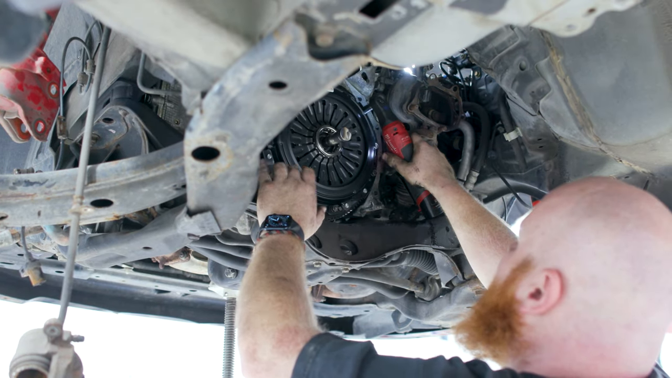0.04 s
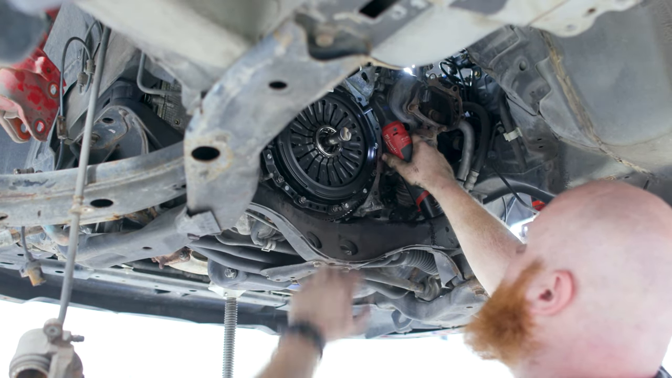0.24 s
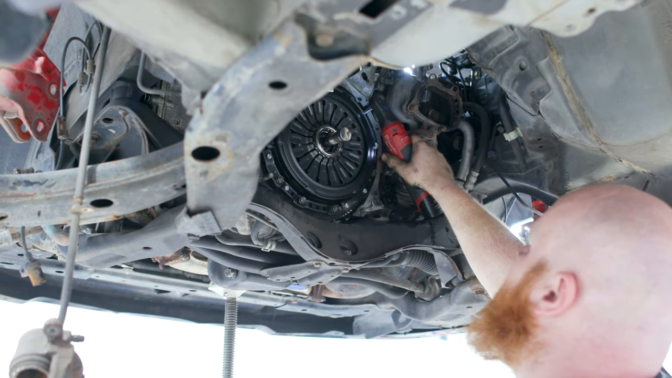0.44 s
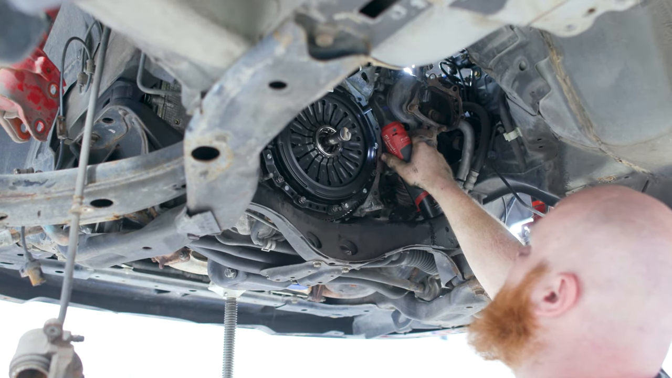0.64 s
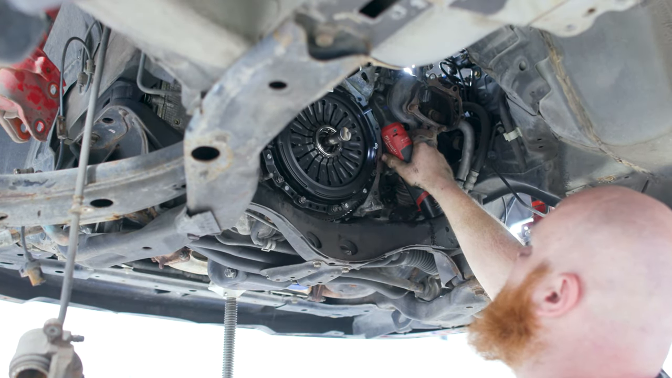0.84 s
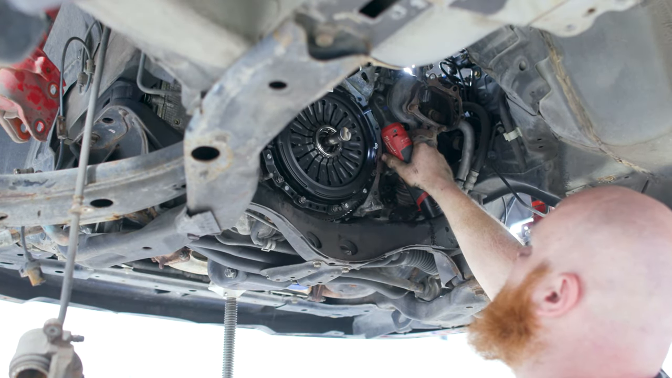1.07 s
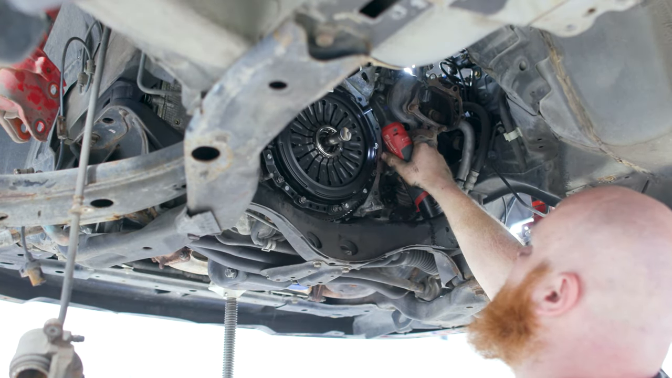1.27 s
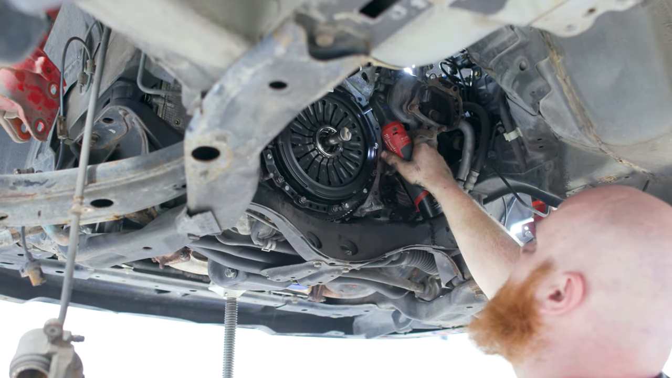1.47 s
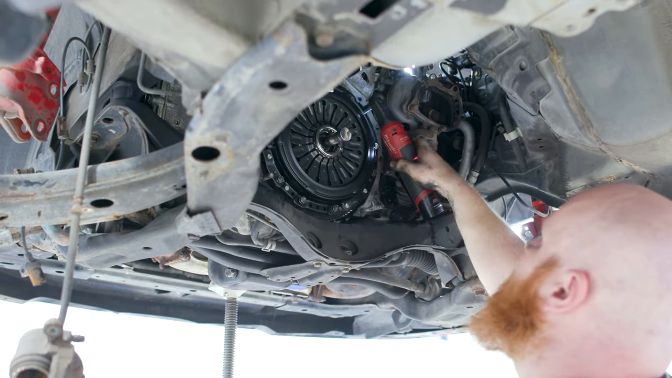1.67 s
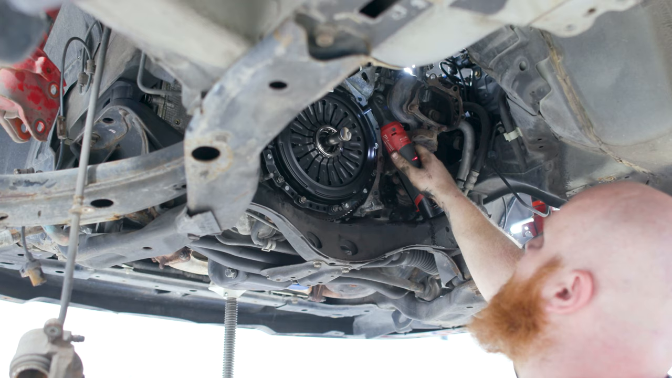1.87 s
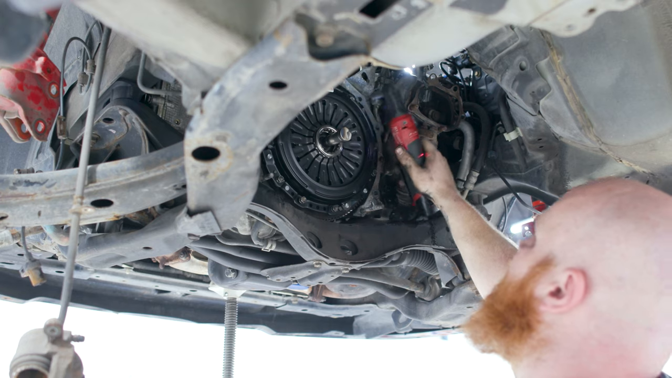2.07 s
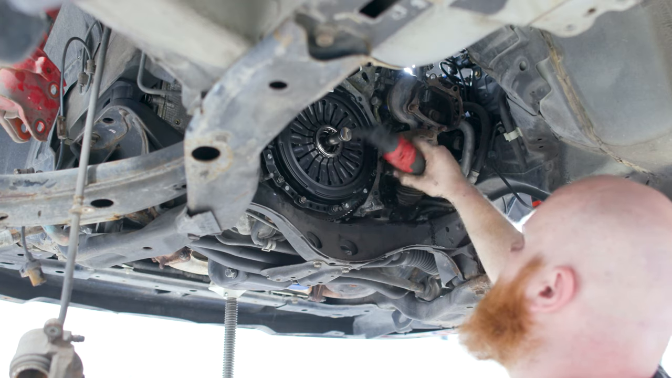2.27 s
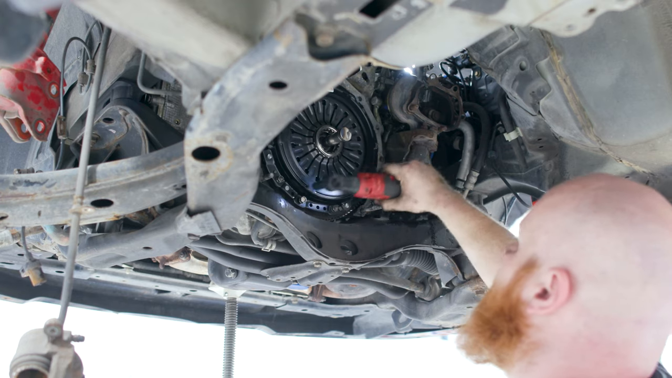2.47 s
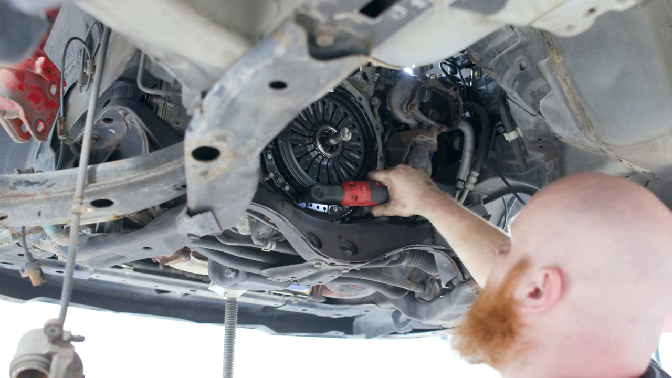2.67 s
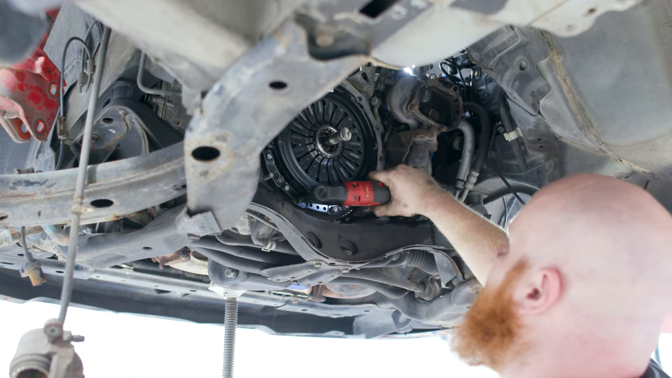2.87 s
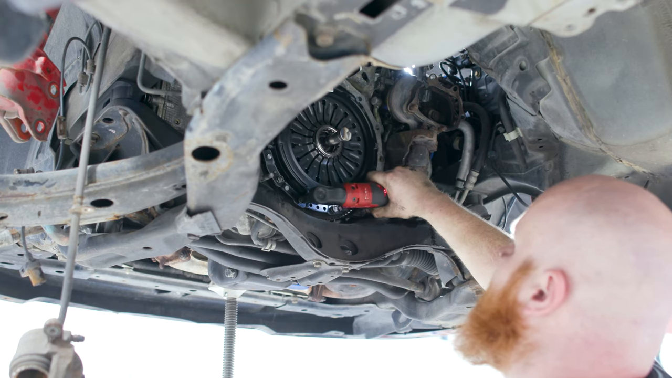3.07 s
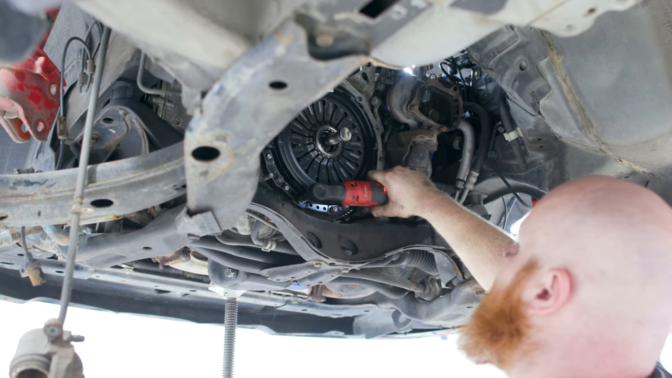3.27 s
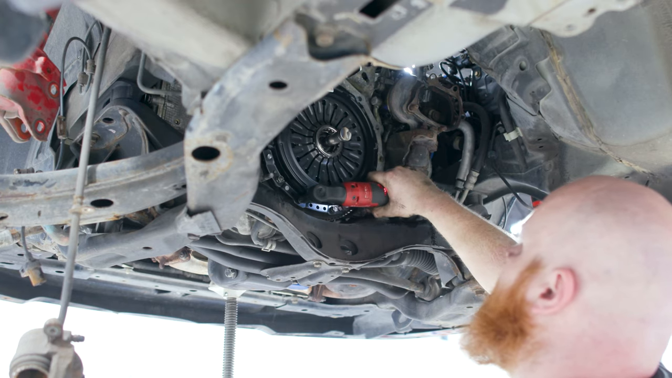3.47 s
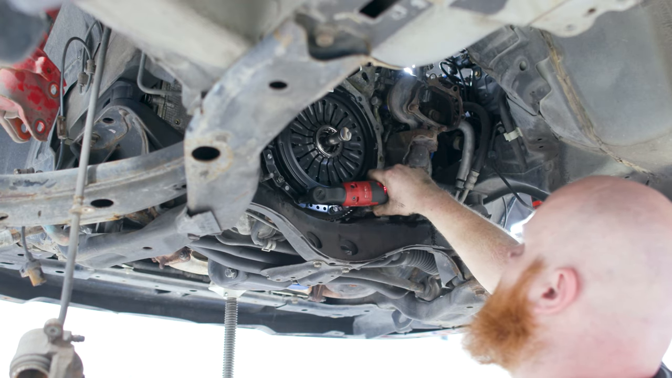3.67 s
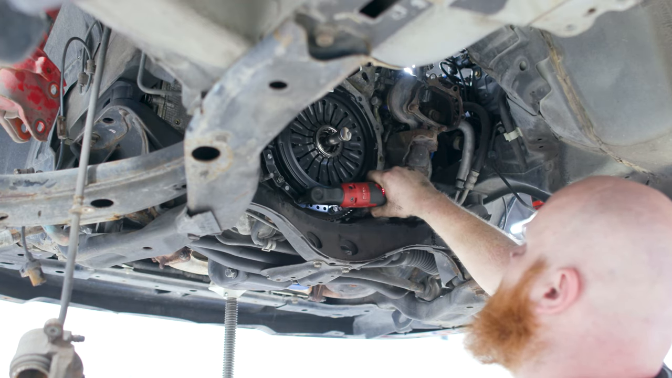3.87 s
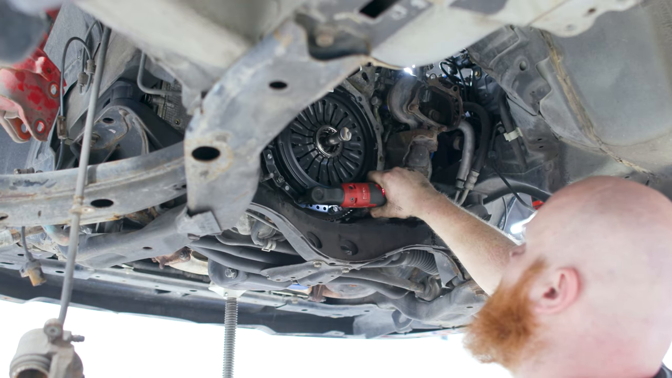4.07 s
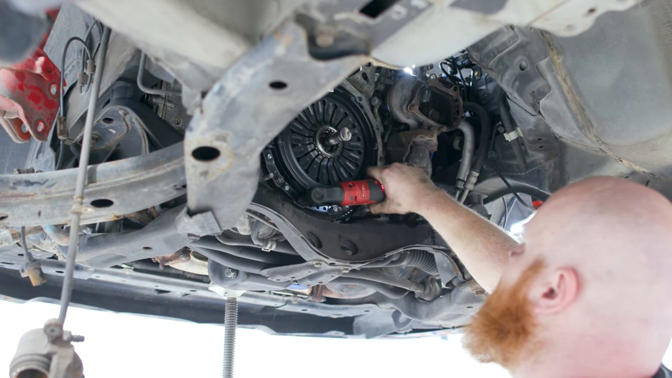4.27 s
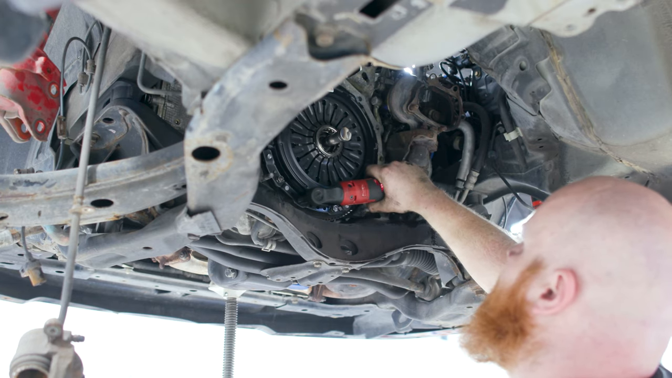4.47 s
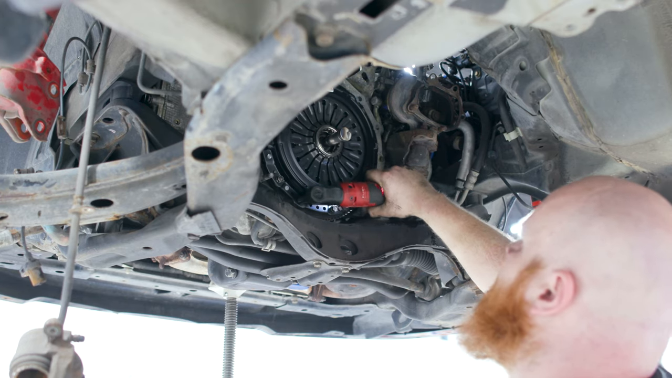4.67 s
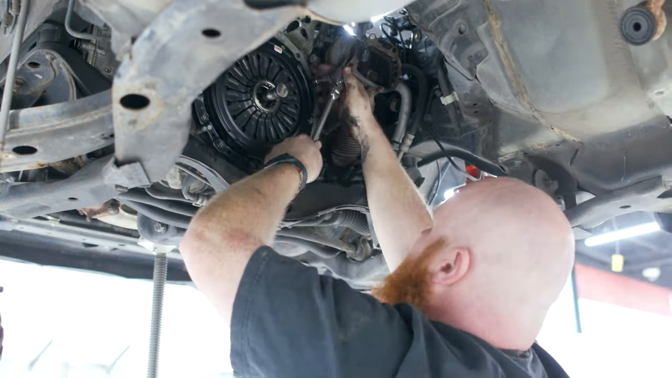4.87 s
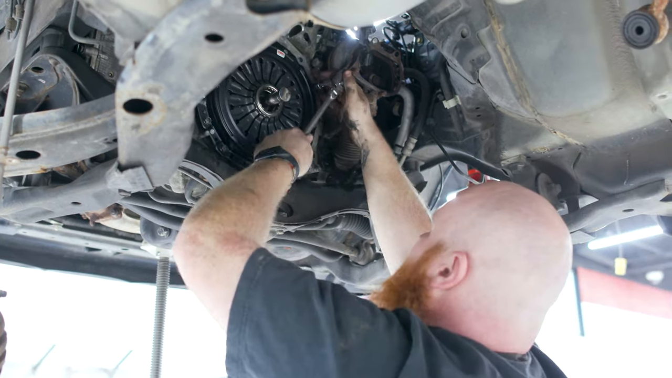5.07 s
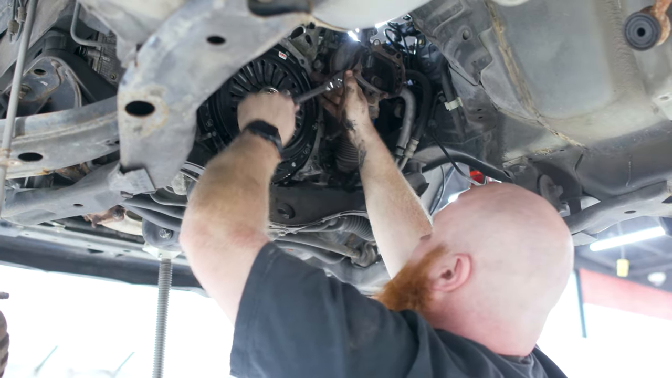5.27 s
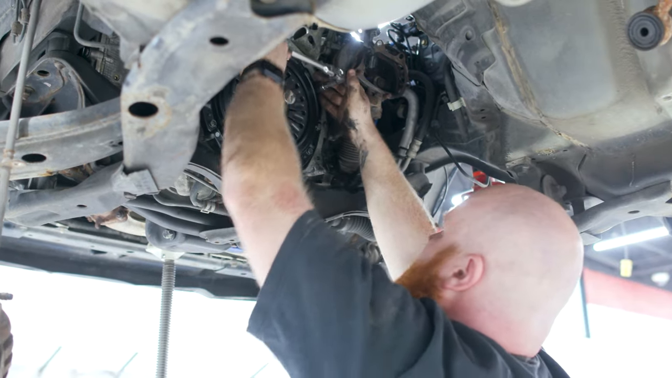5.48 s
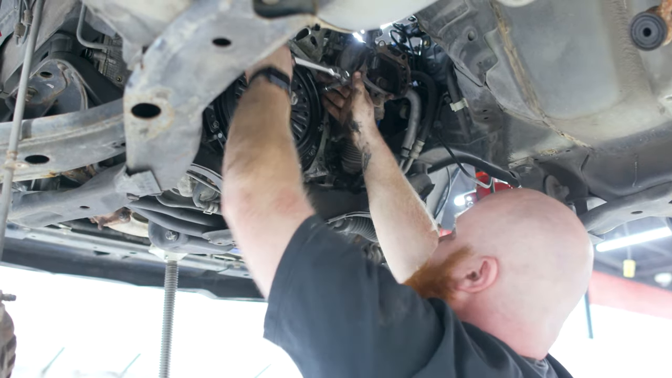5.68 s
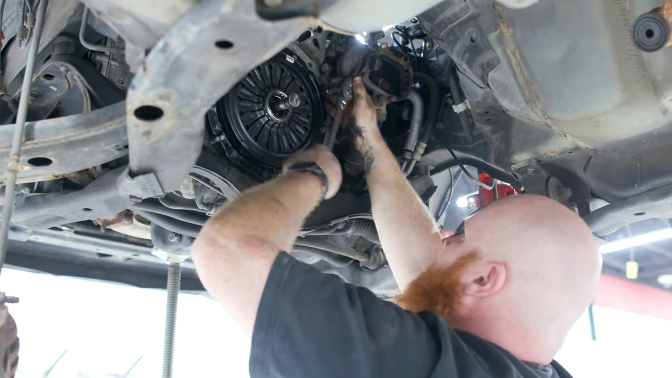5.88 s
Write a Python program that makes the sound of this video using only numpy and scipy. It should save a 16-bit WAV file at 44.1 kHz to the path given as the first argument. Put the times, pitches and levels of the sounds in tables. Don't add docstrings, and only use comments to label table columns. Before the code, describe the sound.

Close to the microphone, a cordless ratchet starts with a brief whistle and rasps for about a second, slowing into separate knocks as the bolt tightens. Quiet handling and metal ticks follow, then a hard clank on steel. A very short burst and another stalling burst come next, then near quiet with workshop hum and a faint hand-ratchet clicking at the end.

```python
import sys
import numpy as np
from scipy import signal
from scipy.fft import rfft, irfft, next_fast_len
from scipy.io import wavfile
from scipy.ndimage import uniform_filter1d

SR = 44100
rng = np.random.default_rng(int(sys.argv[2]) if len(sys.argv) > 2 else 0)


def ratio_of_db(decibels):
    return 10 ** (np.asarray(decibels, float) / 20)


def bounce(signal):
    frames = np.transpose(np.atleast_2d(signal))
    limited = np.clip(frames, -1, 1)
    pcm = np.round(limited * 32767).astype(np.int16)
    wavfile.write(sys.argv[1], SR, pcm)


N = 261072


def unit(x):
    return x / np.sqrt(np.mean(x ** 2) + 1e-20)


def drift(n, size, passes=1):
    x = rng.standard_normal(n)
    for _ in range(passes):
        x = uniform_filter1d(x, size=size)
    return unit(x)


def along(points, hz):
    f, v = np.transpose(points)
    return np.interp(np.log(hz + 1), np.log(f + 1), v)


def span(rows):
    s, *cols = np.transpose(rows)
    start = round(s[0] * SR)
    t = np.arange(start, min(round(s[-1] * SR), N)) / SR
    return start, [np.interp(t, s, c) for c in cols]


def add(out, start, x):
    out[start:start + len(x)] += x[:len(out) - start]


def hump(middle_s, width_s):
    return np.exp(-.5 * ((np.arange(N) / SR - middle_s) / width_s) ** 2)


def filtered(x, response):
    m = next_fast_len(len(x) + 8192)
    return irfft(rfft(x, m) * response(np.fft.rfftfreq(m, 1 / SR)), m)[:len(x)]


def modes(peaks):
    def response(f):
        total = 0
        for k, (c, w, db) in enumerate(peaks):
            total = total + (-1) ** k * ratio_of_db(db) * 1j * f * w / (c * c - f * f + 1j * f * w)
        return total
    return response


def noise(n, peaks):
    return unit(filtered(rng.standard_normal(n), modes(peaks)))


def ratchet():
    # t/s, speed/(turns/s)
    cranks = [
        [(.24, 10), (.33, 95), (.5, 120), (.63, 105), (.755, 111), (.805, 76), (.91, 72), (1.145, 52.5),
         (1.274, 34)],
        [(3.08, 10), (3.16, 95), (3.2, 107), (3.28, 105.5), (3.345, 121), (3.4, 121), (3.49, 90)],
        [(3.83, 10), (3.91, 102), (4.03, 122), (4.16, 124), (4.27, 104), (4.35, 70), (4.414, 49), (4.52, 33.8),
         (4.607, 14)],
    ]
    # t/s, level/dB
    efforts = [
        [(.254, -42), (.3, -31), (.355, -16), (.605, -13.5), (.681, -16.5), (.74, -15), (.807, -18),
         (1.03, -21), (1.277, -22)],
        [(3.09, -47.5), (3.13, -30.5), (3.184, -17.5), (3.318, -15.5), (3.414, -15), (3.478, -18)],
        [(3.848, -39), (3.89, -23), (3.962, -15), (4.266, -13), (4.51, -23.5), (4.562, -22), (4.58, -35),
         (4.598, -24), (4.614, -25)],
    ]
    # f/Hz, density/(dB per Hz)
    colours = [
        [(1350, -24), (2300, -5), (2970, -2), (4880, -1), (6660, -4.5), (7700, -3.5), (10000, -8.5),
         (15600, -18.5)],
        [(1350, -28), (2300, -7), (3630, -2), (4100, -6), (5820, -2), (9250, -8), (11800, -9), (15600, -22.5)],
        [(1350, -28.5), (2300, -5.5), (3090, -2.5), (3900, -4), (5820, 1.5), (6300, -3.5), (11000, -7.5),
         (15600, -22)],
    ]
    # f/Hz, width/Hz, level/dB
    heads = [
        [(3810, 110, -5.5), (4398, 70, 3.5), (4905, 93, -4), (5720, 89, -2.5), (5940, 71, -3.5), (7450, 42, -2),
         (7650, 40, -7.5), (7860, 58, -8), (10400, 52, -7)],
        [(3940, 180, -7), (4730, 48, 3.5), (5710, 91, -9.5), (7090, 72, -1.5), (7400, 54, -8.5),
         (8970, 43, -1.5), (10300, 69, -9.5)],
        [(3790, 350, -6.5), (4950, 190, 0), (5100, 67, -1.5), (5740, 63, -0.5), (7000, 95, -8.5),
         (8530, 80, -4.5), (10400, 30, -7.5), (10900, 40, -7.5)],
    ]
    # f/Hz, width/Hz, level/dB
    housings = [
        [(1574, 260, -9), (2019, 53, 7.5), (2256, 470, -5), (2230, 130, -11.5)],
        [(1620, 600, 8.5), (2000, 67, 0), (2540, 480, -11)],
        [(1766, 140, 6.5), (2040, 110, 8), (2460, 750, -1)],
    ]
    # f/Hz, width/Hz, level/dB
    parts = [
        [(218, 180, -5), (590, 23, -22.5), (669, 85, 8.5), (910, 110, 2.5), (1218, 150, 6)],
        [(341.8, 61, -21), (495, 32, -8.5), (926, 74, -5), (957, 67, -7), (1210, 70, -1.5), (1410, 78, -11)],
        [(343, 44, -12.5), (482, 33, -4), (780, 230, -4.5), (1045, 80, -2), (1191, 60, 5), (1535, 440, -6.5)],
    ]
    # housing free/dB, housing biting/dB, part free/dB, part biting/dB, rebound re blow
    grips = [
        (-6, -13, -14, -2, 0.46),
        (-10.5, -14, -11, -9, .6),
        (-10, -8, -13, 1, 0.43),
    ]
    sags = [
        0,
        0,
        0.1,
    ]
    # t/s, width/s, first order/dB, second order/dB
    shakes = [
        (0.521, 0.026, -26.5, -26.5),
        (.75, 0.028, -23, -28.5),
        (1.0, .04, -58, -28.5),
        (1.15, 0.036, -62, -33.5),
    ]
    out = whine()
    for settings in zip(efforts, grips, cranks, housings, parts, sags, colours, heads):
        add(out, *burst(*settings))
    angle_rad = 2 * np.pi * turns(cranks[0], 0, N)
    for t_s, width_s, first_db, second_db in shakes:
        orders = ratio_of_db(first_db) * np.sin(angle_rad) + ratio_of_db(second_db) * np.sin(2 * angle_rad)
        out += hump(t_s, width_s) * orders
    return out


def burst(effort, grip, crank, housing, part, sag, colour, head):
    start, rasp_db = rasp_level(effort)
    n = len(rasp_db)
    angle = turns(crank, start, n)
    speed = np.gradient(angle) * SR
    spun = np.arange(n) > np.argmax(speed > 90)
    load = np.clip((95 - speed) / 45, 0, 1) * spun
    bite = np.clip((114.4 - speed) / 52, 0, 1) * spun
    bite = np.abs(uniform_filter1d(bite, size=1500))

    housing_free_db, housing_biting_db, part_free_db, part_biting_db, rebound = grip
    housing_db = housing_free_db + bite ** 1.6 * (housing_biting_db - housing_free_db)
    part_db = part_free_db + bite ** 0.7 * (part_biting_db - part_free_db)

    hits = pawl_hits(angle, bite, rebound)
    rattle = gear_rattle(hits, load)
    blows = pawl_blows(hits, speed)
    flutter_db = 1.18
    housing_db = housing_db + flutter_db * drift(n, 1800, passes=2)
    part_db = part_db + flutter_db * drift(n, 1800, passes=2)

    rasp = head_rasp(rattle, blows, colour, head)
    knock = ratio_of_db(housing_db) * unit(filtered(rattle + 0.7 * blows, modes(housing)))
    thud = ratio_of_db(part_db) * part_ring(.62 * rattle + blows, speed, bite, part, sag)
    return start, ratio_of_db(rasp_db) * (rasp + knock + thud)


def rasp_level(effort):
    (first_s, first_db), (stall_s, stall_db) = effort[0], effort[-1]
    start_s, start_db = .006, 17
    stop_s, stop_db = .024, 18.5
    onset = [(first_s - 3 * start_s, first_db - 24), (first_s - start_s, first_db - start_db)]
    release = [(stall_s + stop_s, stall_db - stop_db), (stall_s + 2 * stop_s, stall_db - 3 * stop_db)]
    start, (rasp_db,) = span(onset + effort + release)
    return start, rasp_db


def turns(crank, start, n):
    s, speed = np.transpose(crank)
    angle = np.cumsum(np.interp((start + np.arange(n)) / SR, s, speed)) / SR
    return angle - angle[min(round(s[-1] * SR) - start, n - 1)]


def pawl_hits(angle, bite, rebound):
    rebound_s = .0073
    play_turns = (.004 + .003 * (1 - bite)) * drift(len(angle), 300)
    whole = np.maximum.accumulate(np.floor(angle + play_turns))
    stroke = np.diff(whole, prepend=whole[0])
    strength = np.clip(rebound * (1 + 0.4 * bite), 0, 1.6)
    return stroke + strength * np.roll(stroke, round(rebound_s * SR))


def gear_rattle(hits, load):
    n = len(hits)
    t = np.arange(SR // 40) / SR
    pulse = (1 - np.exp(-t / 0.0022)) * np.exp(-t / 0.0024)
    uneven = ratio_of_db((1.6 + 1.5 * load) * rng.standard_normal(n))
    swell = signal.fftconvolve(hits * uneven, pulse)[:n]
    gate = 1 + (1.4 + 2.6 * load) * swell
    gate /= np.sqrt(np.abs(uniform_filter1d(gate ** 2, size=2600)))
    teeth = ratio_of_db(1.9 * drift(n, 24))
    return unit(teeth * rng.standard_normal(n)) * gate


def pawl_blows(hits, speed):
    grind_s, grind_speed, grind_hz = .004, 45, 130

    def grind(f):
        return np.exp(-2j * np.pi * grind_s * (f - grind_hz * np.cos(f / grind_hz)))

    blows = hits * ratio_of_db(1.3 * rng.standard_normal(len(hits))) * np.sqrt(SR / (speed + 40))
    slow = np.clip(2 - 2 * speed / grind_speed, 0, 1)
    return blows * (1 - slow) + filtered(blows * slow, grind)


def head_rasp(rattle, blows, colour, head):
    ring = modes(head)
    rasp = unit(filtered(rattle, lambda f: ratio_of_db(along(colour, f)) * (1 + 0.54 * np.abs(ring(f)))))
    ringing = filtered(rattle + .8 * blows, lambda f: ring(f) * (f > 2500) * ratio_of_db(along(colour, f)))
    return rasp + ratio_of_db(-9) * unit(ringing)


def part_ring(drive, speed, bite, part, sag):
    sunk = np.clip((85 - speed) / 27, 0, 1) * (bite > .3)
    tight = []
    for hz, width_hz, db in part:
        if sag and hz > 1000:
            tight.append((hz * (1 - sag), width_hz * 1.7, db - 3))
        else:
            tight.append((hz, width_hz, db + 2.5 * (sag > 0)))
    return unit(filtered(drive * (1 - sunk), modes(part)) + filtered(drive * sunk, modes(tight)))


def whine():
    # t/s, sideband climb/(Hz/s), carrier/dB, lower/dB, upper/dB
    spin_ups = [
        (0.239, 9110, -38, -35, -39),
        (3.078, 15000, -48.5, -49.5, -37.5),
        (3.82, 13000, -52.5, -48.5, -37),
    ]
    # t/s, length/s, carrier/dB, drift/(dB/s)
    stalls = [
        (1.285, 0.069, -40, -140),
        (4.572, .025, -38, -100),
        (4.642, 0.034, -52, 280),
    ]
    carrier_s, sideband_s, sideband_wide_s = .009, .046, .018
    out, t = np.zeros(N), np.arange(N) / SR
    carrier = 2 * np.pi * 7900 * t
    for s, climb, carrier_db, lower_db, upper_db in spin_ups:
        split = np.pi * climb * (t - s) ** 2
        sides = ratio_of_db(lower_db) * np.sin(carrier - split) + ratio_of_db(upper_db) * np.sin(carrier + split)
        onset = np.clip((t - s) / carrier_s, 0, 1)
        out += ratio_of_db(carrier_db) * hump(s + carrier_s, .008) * np.sin(carrier)
        out += hump(s + sideband_s, sideband_wide_s) * onset * sides
    for s, length_s, db, drift_db in stalls:
        level = ratio_of_db(db + drift_db * (t - s).clip(0, length_s))
        ramps = np.clip(np.minimum(t - s, s + length_s - t) / 0.0066, 0, 1)
        out += level * ramps * np.sin(carrier)
    return out


def clinks():
    # t/s, peak/dB, centre f/Hz, low knock re peak/dB, ring/dB
    ticks = [(0.1259, -53, 3340, -2, -16), (0.1466, -49, 3390, -13.5, -10), (0.1675, -40, 3460, -4, -15),
             (1.6072, -53, 2000, -6, -16.5), (1.7602, -31, 3900, -20, -18),
             (1.7676, -32.5, 4800, -13, -24.5), (2.0036, -41.5, 2580, -8, -24),
             (2.0074, -37, 2070, -3, -24.5), (2.059, -40.5, 4730, -25, 0),
             (2.0665, -40.5, 4560, -22, -14.5), (2.1976, -53, 1396, 7, -16), (3.018, -47, 6990, -34, -19.5),
             (5.7952, -45.5, 4490, -17, -21), (5.8024, -50.5, 5075, 0.5, -18.5)]
    # t/s, peak/dB, centre f/Hz, low knock re peak/dB, ring/dB
    clanks = [
        (2.719, -17.5, 2950, -8, -10.5),
        (2.7269, -23.5, 2980, 2.5, -11),
        (2.9419, -41, 5500, 9, -1),
        (2.9518, -41, 2400, 9.5, -12.5),
    ]
    # t/s, peak/dB, centre f/Hz, low knock re peak/dB, t60/s
    settling = [(1.252, -41, 2000, 16.5, .3), (1.3, -44, 2000, 13, 0.23), (1.345, -30, 2460, 4.5, .11),
                (1.365, -40, 6070, -15, 0.09), (1.44, -45.5, 6790, -23, .05),
                (1.452, -37.5, 5500, -20, .067), (1.508, -35, 2590, -19, 0.057), (3.5, -42, 6000, -13, 0.5),
                (4.611, -42.5, 2000, 15.5, 0.13), (4.675, -36, 5000, -12, .14), (4.735, -40, 3920, 0.5, .2),
                (4.82, -37.5, 2190, -14, .11), (4.852, -47, 1239, -20, 0.51)]
    # f/Hz, level/dB, t60/s
    socket = [(4260, -3, .09), (4880, -2, .1), (5920, 0, .07)]
    # f/Hz, level/dB, t60/s
    flywheel = [(1206, -1, .2), (1235, -6, .25), (1857, -5, .13), (2541, -14, .1), (3451, -9, .25),
                (3833, -5, .15), (3876, -9, .2), (4522, -25, .15), (4764, -16, .1), (6815, -26, .15),
                (11070, -22, .15)]
    ticks = [(*row, 0.044, ring_db) for *row, ring_db in ticks]
    clanks = [(*row, 0.041, ring_db) for *row, ring_db in clanks]
    settling = [(*row, -50) for row in settling]
    out = contacts(ticks, socket, knock_hz=1200, attack_s=.0005)
    out += contacts(clanks, flywheel, knock_hz=1177, attack_s=0.00027)
    return out + contacts(settling, socket, knock_hz=277, attack_s=0.0025)


def contacts(events, steel, knock_hz, attack_s):
    out, t = np.zeros(N), np.arange(SR // 3) / SR
    n = len(t)
    for s, db, hz, knock_db, t60_s, ring_db in events:
        fade = ratio_of_db(-60 * t / max(t60_s, .005)) * (1 - np.exp(-t / attack_s))
        band = modes([(hz, 0.9 * hz, 0)])
        scuff = unit(filtered(rng.standard_normal(n), lambda f: band(f) ** 2))
        knock = unit(filtered(noise(n, [(knock_hz, 600, 0)]), modes([(knock_hz, 900, 0)])))
        dull_db = max(knock_db + 3.5, 0)
        ring = np.zeros(n)
        for f, mode_db, life_s in steel:
            level_db = mode_db - dull_db * (f > 2000) + rng.normal(0, 1.5)
            ring += ratio_of_db(level_db - 60 * t / life_s) * np.sin(2 * np.pi * f * t)
        ring *= ratio_of_db(3 * drift(n, 350))
        hit = fade * (scuff + ratio_of_db(knock_db) * knock) + ratio_of_db(ring_db) * ring
        add(out, round(s * SR), ratio_of_db(db - 7) * hit)
    return out


def handwork():
    # middle t/s, width/s, body/dB, tool/dB, sleeve/dB
    rubs = [
        (0.02, .1, -67.5, -68, -74),
        (1.8, 0.16, -71, -60.5, -73.5),
        (2.13, 0.056, -60.5, -74, -76),
        (2.25, .07, -68, -77, -68.5),
        (2.5, 0.066, -62, -77, -79.5),
        (2.82, .07, -65.5, -68.5, -74.5),
        (3.03, 0.054, -74, -72, -72),
        (5.04, .04, -71.5, -70.5, -77.5),
        (5.65, .05, -63, -69, -66.5),
    ]
    tool = noise(N, [(2130, 200, -2.5), (2700, 120, 0.5), (3350, 230, -3.5)])
    sleeve = noise(N, [(7800, 7600, 0)])
    body = noise(N, [(615, 200, -1.5), (1080, 250, 0)])
    out = np.zeros(N)
    for s, width_s, body_db, tool_db, sleeve_db in rubs:
        rub = ratio_of_db(body_db) * body + ratio_of_db(tool_db) * tool + ratio_of_db(sleeve_db) * sleeve
        out += hump(s, width_s) * rub
    add(out, *hand_ratchet())
    return out


def hand_ratchet():
    start = round(5.785 * SR)
    n = N - start
    count = np.cumsum(85 * ratio_of_db(3.7 * drift(n, 400))) / SR
    gate = unit(0.28 + np.exp(-(count % 1) / 0.32))
    pawl = ratio_of_db(-59) * noise(n, [(4790, 1000, 3.0), (6350, 670, -5.0)])
    teeth = ratio_of_db(-59.5) * noise(n, [(7930, 1300, 6.0), (12000, 4000, -22.5)])
    handle = ratio_of_db(-57) * noise(n, [(700, 67, 2.5), (1467, 90, -7)])
    rise = np.clip(np.arange(n) / SR / .012, 0, 1)
    return start, rise * (gate * (pawl + teeth) + handle)


def walls(x):
    # f/Hz, t60/s
    decay = [(300, .8), (1200, 1.03), (4000, 0.67), (7000, 0.34), (10000, 0.18), (14000, 0.28)]
    hz, t, z = signal.stft(rng.standard_normal(SR), SR, nperseg=256)
    tail = signal.istft(z * ratio_of_db(-60 * t / along(decay, hz)[:, None]), SR, nperseg=256)[1]
    return signal.fftconvolve(np.pad(x, (500, 0)), tail / np.linalg.norm(tail))[:N]


def shop():
    # f/Hz, density/(dB per Hz)
    rumble = [(12, -47), (20, -22.5), (49, -11), (81, -27), (98, -28), (119, -7.5), (162, -7.5), (200, -65)]
    # f/Hz, density/(dB per Hz)
    hiss = [(150, -59), (181, -17), (290, -21.5), (428, -33.5), (550, -32.5), (1900, -43), (3000, -51),
            (15600, -63)]
    # f/Hz, waver/Hz, level/dB
    fan = (115.1, 7, -43)
    fan_hz, waver_hz, fan_db = fan

    def colour(f):
        return (ratio_of_db(along(rumble, f)) + ratio_of_db(along(hiss, f))) * (np.abs(f - fan_hz) > 22)

    air = filtered(rng.standard_normal(N), colour)
    phase = np.cumsum(fan_hz + waver_hz * drift(N, 900, passes=2)) / SR
    hum = np.sin(2 * np.pi * phase) * ratio_of_db(1.9 * drift(N, 1800))
    return ratio_of_db(-46.5) * unit(air) + ratio_of_db(fan_db) * unit(hum)


def scene():
    near = ratchet() + clinks()
    return (near + ratio_of_db(-20.5) * walls(near) + handwork() + shop())[None]


def top_cut(x):
    return signal.sosfilt(signal.butter(12, 15710, fs=SR, output="sos"), x)


def record(dry):
    x = filtered(dry[0], lambda f: f < 15750)[None]
    x = x / (1 + np.abs(x / .99) ** 8) ** (1 / 8)
    return top_cut(x)


dry = scene()
out = record(dry)
bounce(out)
```